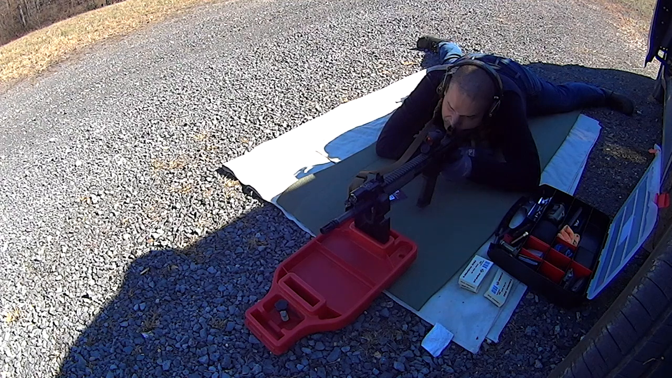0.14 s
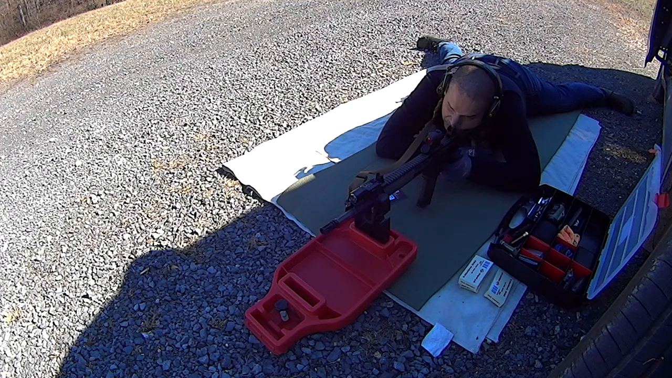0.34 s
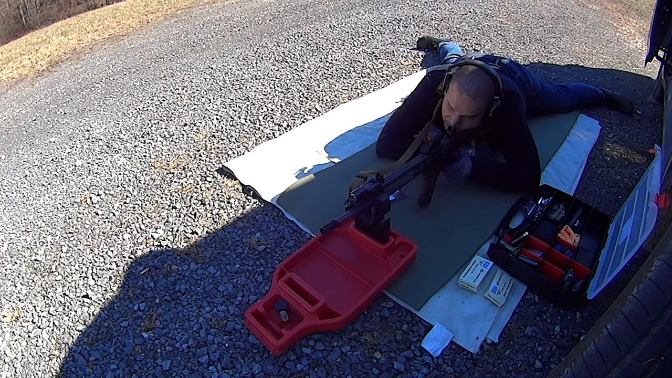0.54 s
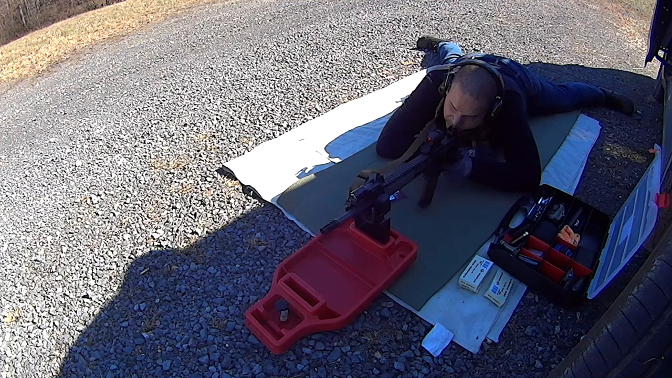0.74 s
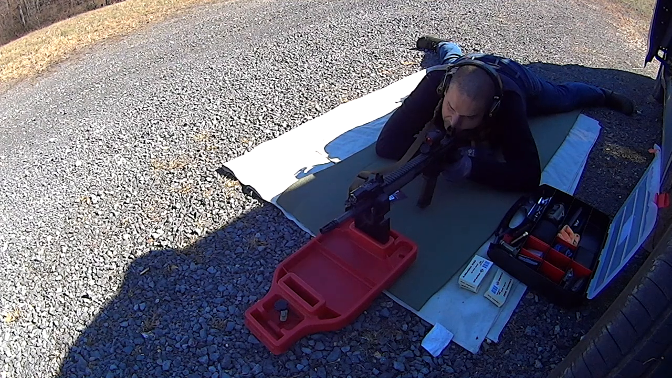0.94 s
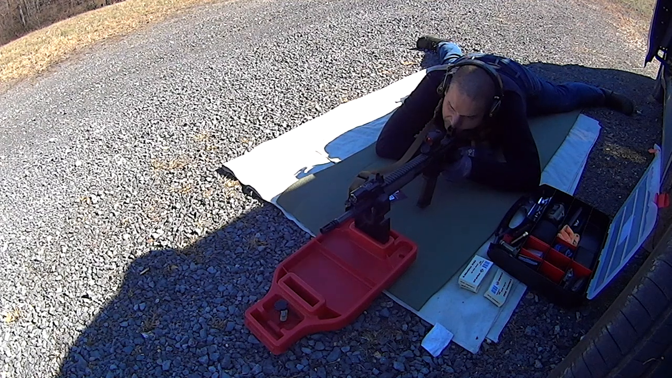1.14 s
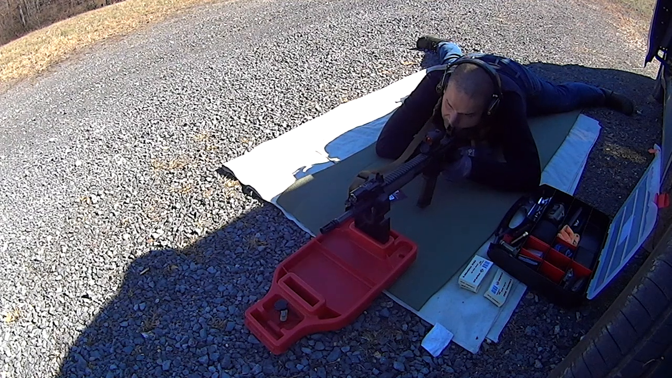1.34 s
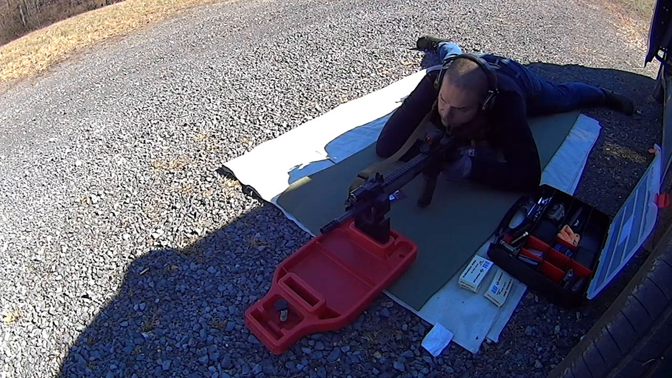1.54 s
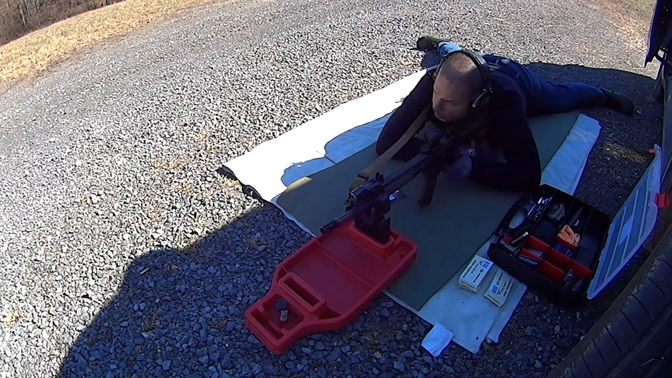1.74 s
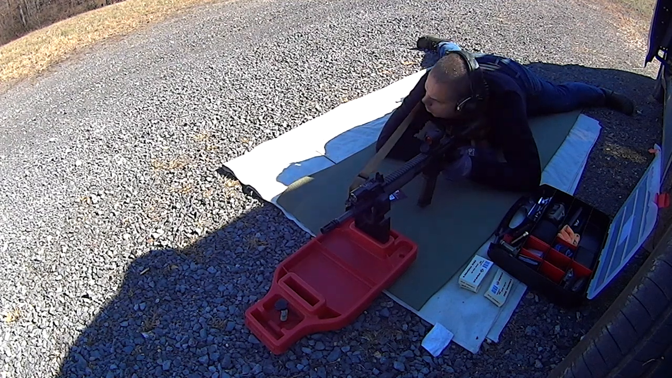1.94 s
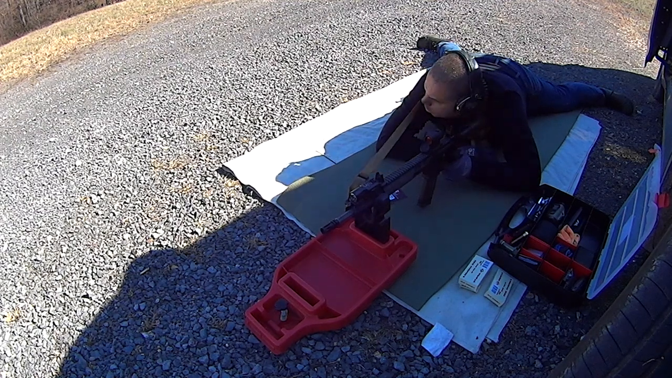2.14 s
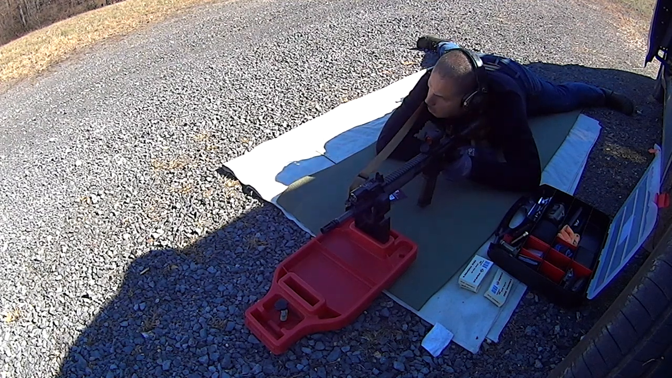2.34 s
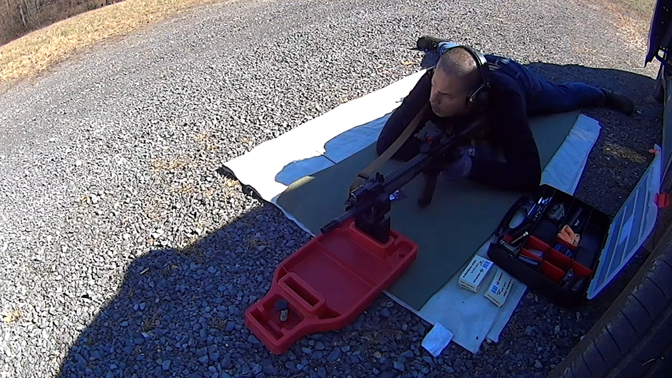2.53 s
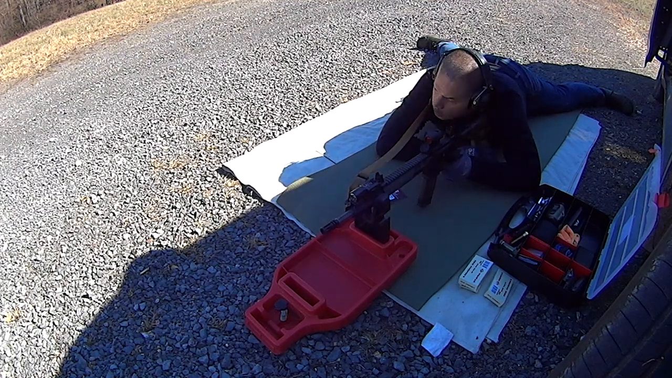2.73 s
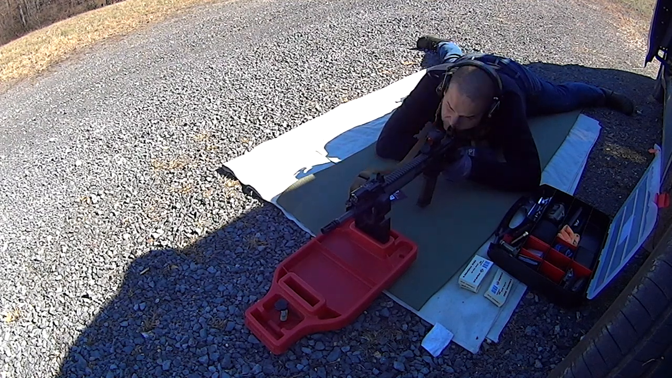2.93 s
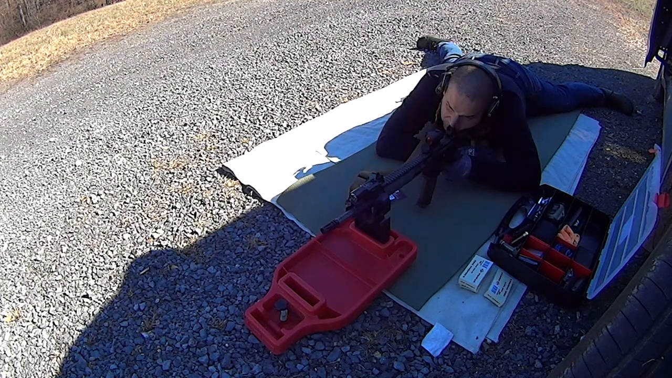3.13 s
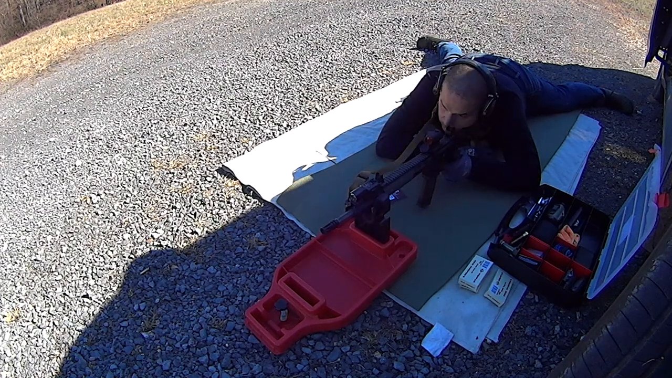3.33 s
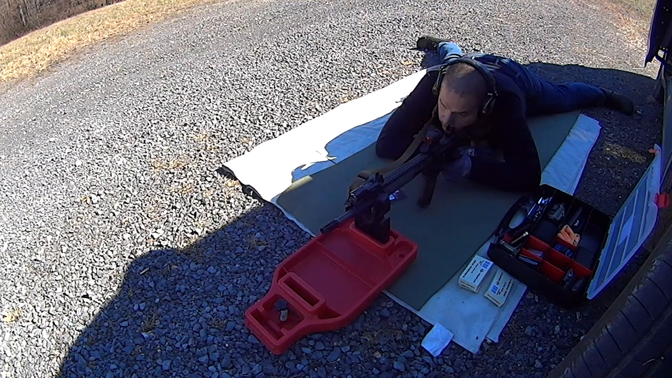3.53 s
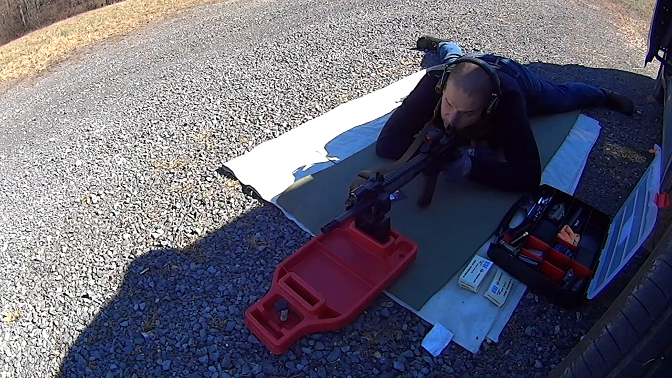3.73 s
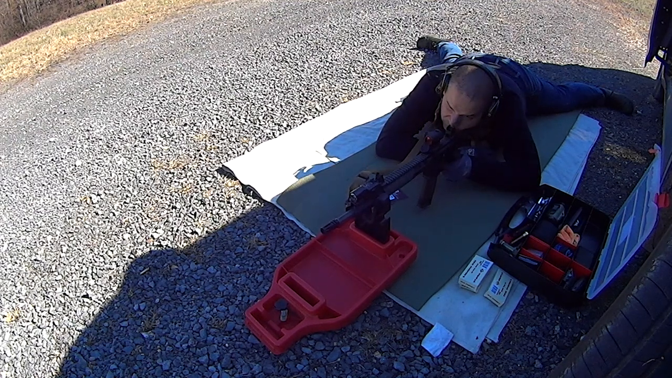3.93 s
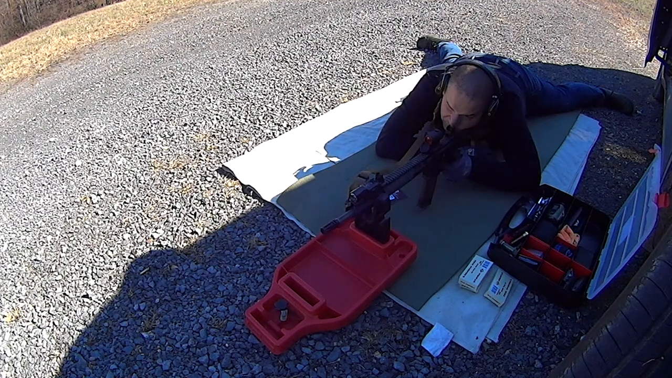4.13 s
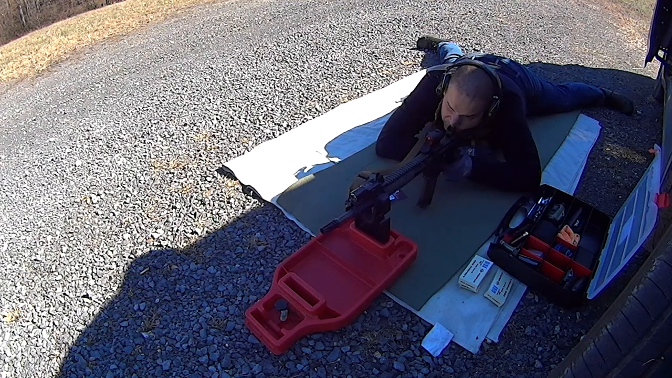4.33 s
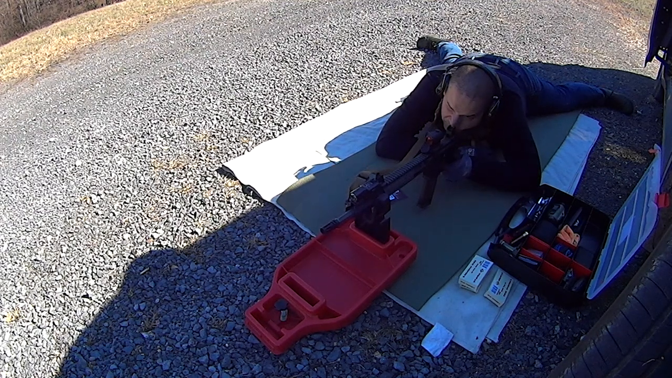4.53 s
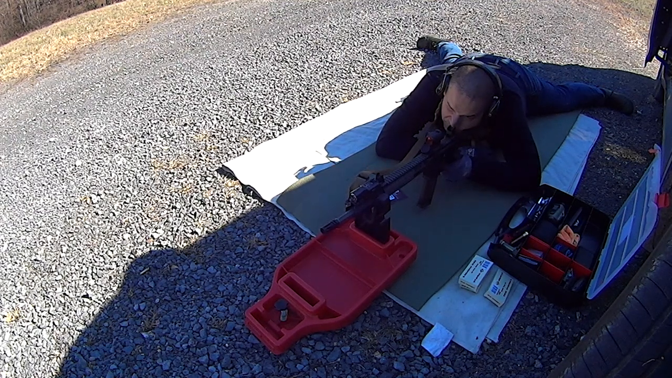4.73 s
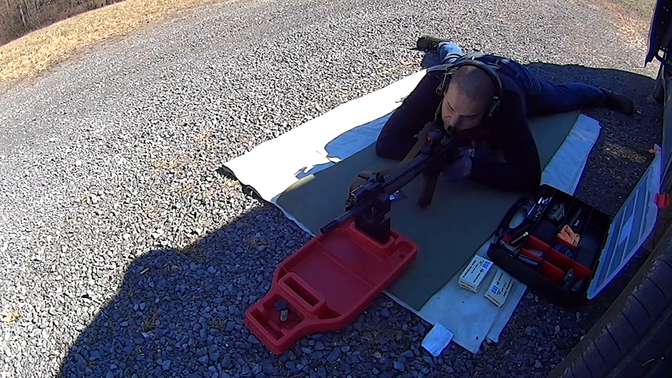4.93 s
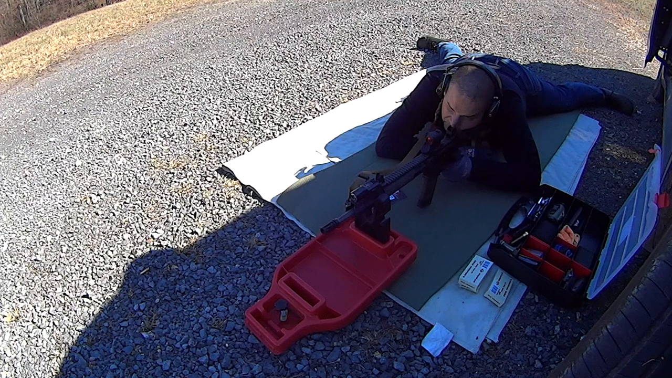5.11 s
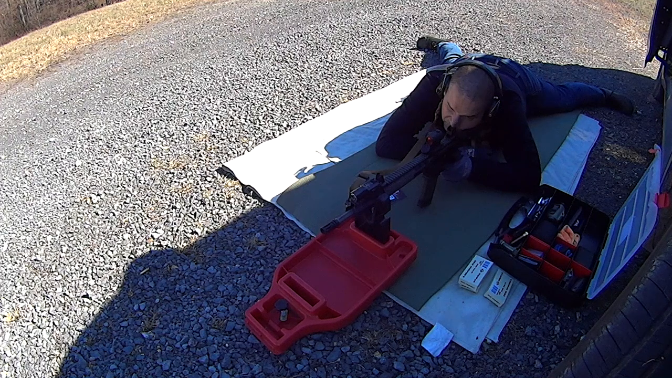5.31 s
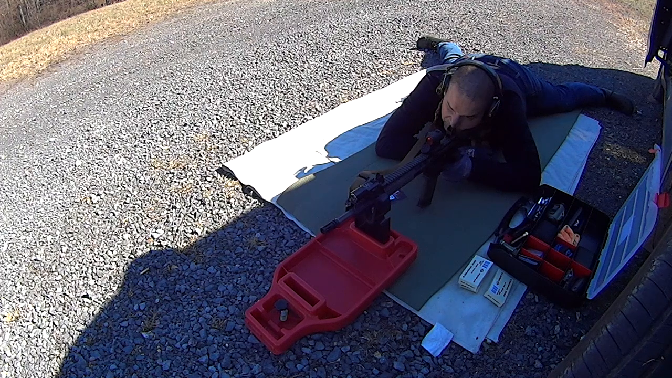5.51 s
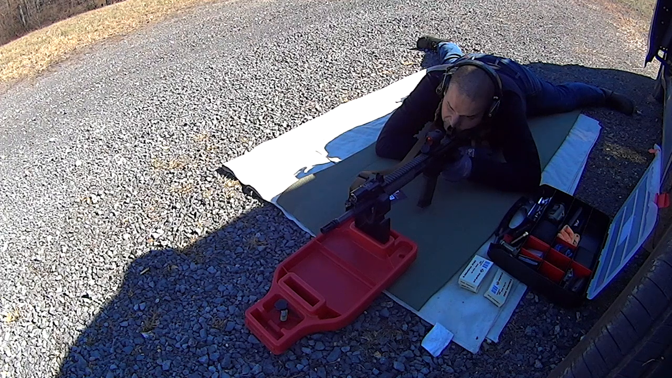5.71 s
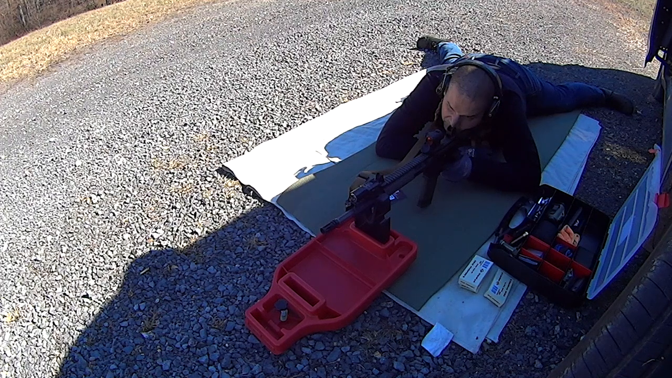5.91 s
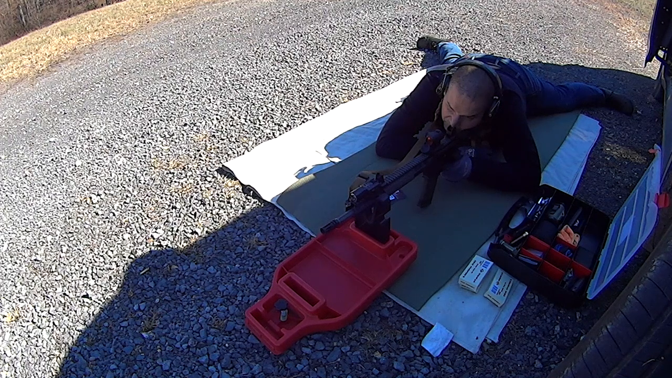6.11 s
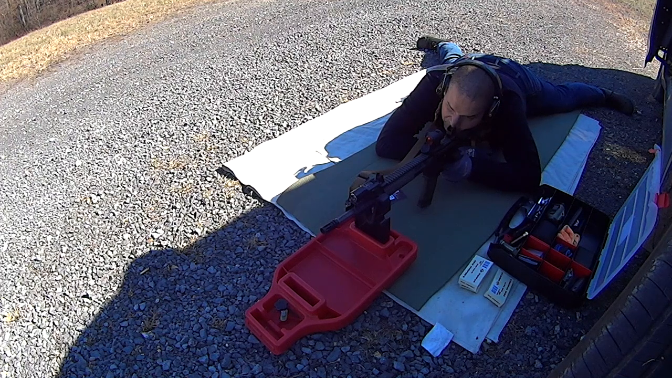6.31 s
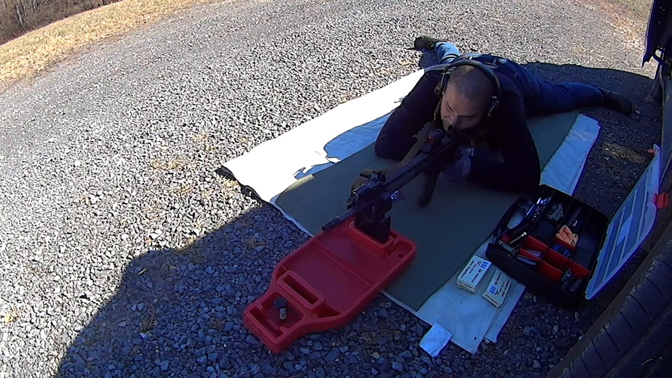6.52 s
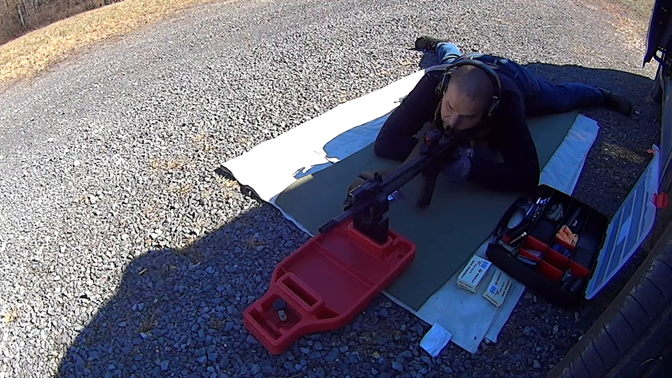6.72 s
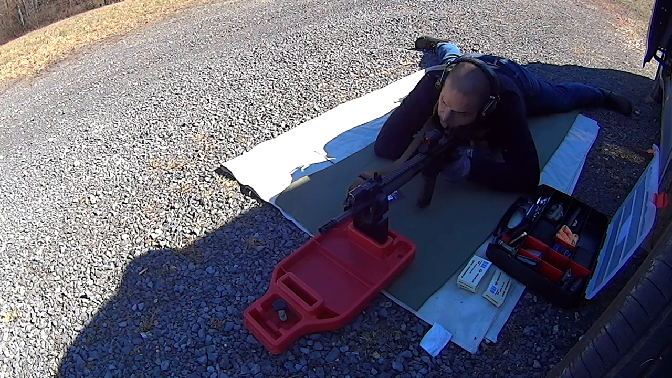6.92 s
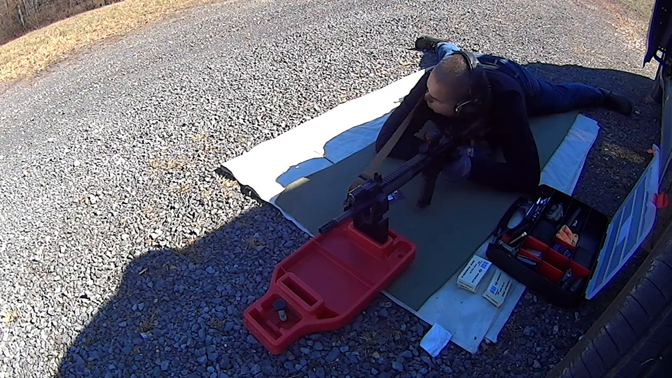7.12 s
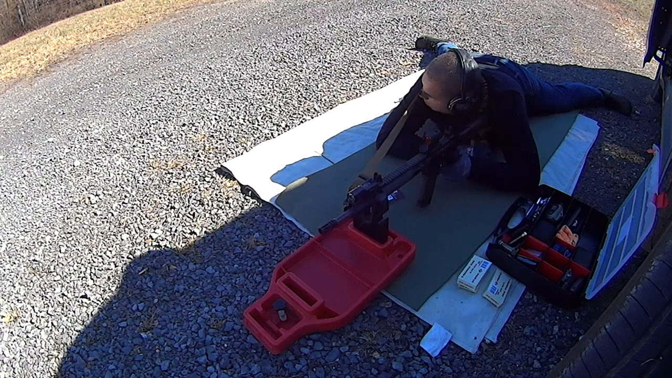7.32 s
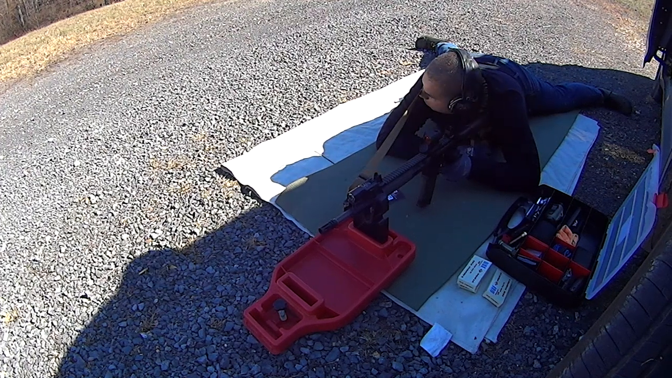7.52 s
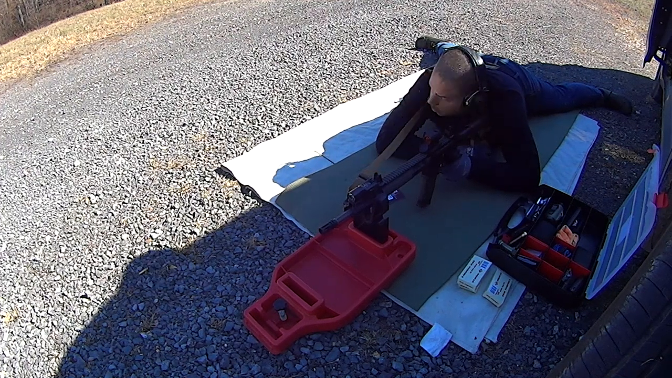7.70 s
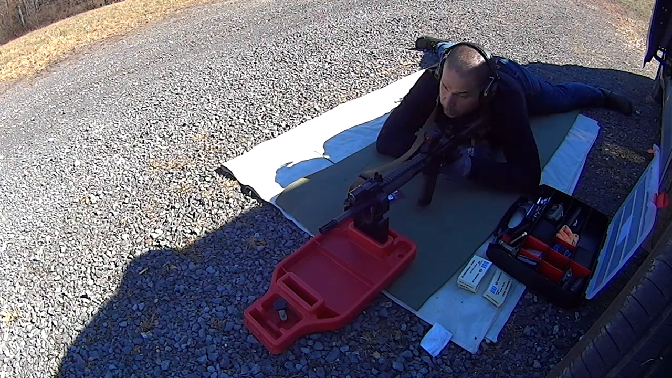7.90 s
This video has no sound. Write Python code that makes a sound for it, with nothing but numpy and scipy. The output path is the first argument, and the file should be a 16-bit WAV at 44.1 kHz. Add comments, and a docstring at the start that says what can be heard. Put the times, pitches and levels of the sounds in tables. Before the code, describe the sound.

Outdoors, a sharp rifle crack and boom rolls off hills and trees for seconds, fades to near quiet, then a second shot follows.

```python
"""Two rifle shots crack and boom beside a parked car on a gravel range, over faint wind and a low murmur.
Gas is a fast-fading rush of noise; the bolt, the spent case and the nearest trees are short pitched bursts.
The car body is coloured noise and low pushes, and its steel rings as fading sine waves.
Banks answer with low pushes too, and wide noise echoes from hills and trees grow duller over several seconds."""
import sys
import numpy as np
from scipy import signal
from scipy.fft import rfft, irfft, next_fast_len
from scipy.io import wavfile

SR = 44100
rng = np.random.default_rng(int(sys.argv[2]) if len(sys.argv) > 2 else 0)


def store_wav(level_fs):
    """Save 16-bit WAV to argv[1]."""
    pcm = np.round(np.clip(np.atleast_2d(level_fs), -1, 1) * 32767)
    wavfile.write(sys.argv[1], SR, pcm.T.astype(np.int16))


N = 355225

# In left-right columns, plus is louder on the left. In colour tables only the shape over Hz counts.

# Low murmur of the valley. Each row: pitch in Hz, relative level in dB per Hz.
MURMUR_COLOUR = [(12, -53.5), (20, -25.5), (86, -10.5), (165, -4.5), (198, -1), (253, -4), (339, -23),
                 (448, -11.5), (555, -26), (653, -27.5), (1000, -26), (1300, -60.5), (2200, -120)]
# Murmur loudness. Each row: time in seconds, level in dB.
MURMUR_LEVEL = [(0, -54), (5, -55), (6.1, -62.5), (6.3, -54.5), (8.05, -51)]
# Air moving over the microphones. Each row: pitch in Hz, relative level in dB per Hz.
WIND_COLOUR = [(11, -39.5), (18, -12), (86, -0.5), (113, -17), (140, 1.5), (180, -26.5), (310, -120)]
# Wind loudness. Each row: time in seconds, level in dB.
WIND_LEVEL = [(0, -77), (2, -57), (6, -67.5), (8.05, -64)]
# The shots. Each row: start in seconds, level added to car and echoes in dB, treble lift of the far echo
# in dB per second and octave, starting blast level in dB, bolt cycle in seconds.
SHOTS = [(0.602, 2, 2, -15, .134), (6.509, 2, 1, -13, 0.15)]
# Hiss of the gas. Each row: pitch in Hz, relative level in dB per Hz.
GAS_COLOUR = [(710, -14.5), (1200, -2), (1960, -3.5), (3120, -18.5), (3400, -4), (3910, -6), (5250, -3),
              (7730, -6.5), (11200, -11.5), (11500, -24.5), (15000, -60), (22000, -120)]
# Hiss while the bolt runs and after. Each row: time after the shot in bolt cycles, level in dB.
CYCLE_HISS = [(0, -36), (.3, -32), (.55, -22.5), (.75, -24), (.96, -24), (1.03, -36.5), (1.4, -42.5),
              (1.65, -41.5), (1.9, -42.5)]
# Muzzle crack and bolt contacts. Each row: seconds after the shot, approximate peak in dB, pitch in Hz.
ACTION = [(.0005, 0.5, 5050), (0.017, -7, 1540), (.067, -8.5, 4000), (0.0805, -2.5, 5270),
          (.1033, -4, 1850), (.126, -12, 1995), (.147, -24, 4870)]
# Booming car panels. Each row: pitch in Hz, relative level in dB per Hz.
BOOM_COLOUR = [(24, -59), (40, -26), (102, -14.5), (189, -11.5), (226, -9), (373, 2.5), (413, -9),
               (468, -1), (567, -13), (600, -4.5), (780, -37), (1320, -120)]
# Rattling trim and small parts. Each row: pitch in Hz, relative level in dB per Hz.
RATTLE_COLOUR = [(320, -30), (540, 0.5), (626, -0.5), (1310, -9), (1390, -19.5), (1500, -8), (1860, -13),
                 (2170, -16.5), (3500, -18), (4550, -50), (7700, -120)]
# Car body, timed for the first shot. Each row: time in seconds, boom in dB, rattle in dB,
# both before the shot's added level and the fades.
BODY = [(0.603, -32.5, -29.5), (0.619, -24, -14.5), (0.663, -19.5, -20.5), (0.695, -28.5, -42),
        (0.73, -25, -27.5), (0.745, -21.5, -39.5), (0.79, -24, -37.5), (0.86, -35.5, -39),
        (0.875, -31.5, -36)]
# Ringing steel. Each row: pitch in Hz, relative level in dB, time to fall 60 dB in seconds.
STEEL = [(705, -4, 1.5), (797, 0, 2), (1222, -10, .6), (1373, -9, .8), (1841, -10, 1.5), (2234, -17, .6),
         (2422, -16, .9)]
# Low pushes from the car and nearby (first four rows), then low echoes from banks, timed for the first shot.
# Each row: time in seconds, strength in dB before the shot's added level, pitch in Hz.
LOW_PUSHES = [(0.618, -15.5, 320), (0.651, -11, 457), (0.756, -19.5, 350), (0.77, -13, 384),
              (0.891, -15, 275), (0.977, -14.5, 348), (1.01, -17.5, 258), (1.065, -11, 437),
              (1.083, -11.5, 310), (1.133, -16.5, 218), (1.171, -14, 254), (1.269, -13.5, 226),
              (1.4, -17, 260), (1.475, -19, 296), (1.526, -11.5, 280), (1.582, -11.5, 255),
              (1.667, -15, 286.8), (1.69, -15, 326), (1.731, -12.5, 328), (1.758, -31.5, 275),
              (1.834, -16, 360), (1.864, -16, 315), (1.999, -16.5, 251), (2.056, -17, 344),
              (2.75, -28.5, 310), (2.962, -33.5, 371)]
# Long echo, timed for the first shot. Each row: time in seconds, bright scatter in dB, low roll in dB,
# scatter's left-right difference in dB. Levels are before treble changes and the shot's added level.
ECHO = [(0.859, -39, -40, -2.5), (0.88, -28, -26, 0), (0.92, -22.5, -25, -1.5), (0.97, -25, -27, -2.5),
        (1.0, -28, -32, 1), (1.015, -22, -34, 0), (1.07, -22, -22.5, 0), (1.27, -23.5, -26.5, -0.5),
        (1.38, -27.5, -29.5, 1), (1.58, -27, -24.5, 1.5), (1.85, -30.5, -21.5, 4), (1.9, -31, -28.5, 1.5),
        (2.26, -37, -30, 0.5), (2.969, -51, -46, -1.5), (3.62, -64, -53, -3), (4.1, -67, -58.5, -3),
        (5.55, -82.5, -67, -2.5), (6.4, -79, -67.5, 1.5)]
# Low rolling echo. Each row: pitch in Hz, relative level in dB per Hz.
ROLL_COLOUR = [(35, -54), (60, -37), (81, -25), (190, -3.5), (337, 1), (382, -4.5), (432, -7), (536, -14),
               (651, -35), (700, -29), (910, -48.5), (1540, -120)]
# Brighter scattered echo. Each row: pitch in Hz, relative level in dB per Hz.
SCATTER_COLOUR = [(260, -21), (450, -1.5), (552, -2.5), (863, 2.5), (1120, -3), (1680, -3.5), (2080, -5.5),
                  (2590, -8.5), (4830, -18.5), (5240, -21.5), (5760, -22), (8420, -33.5), (9130, -36),
                  (11000, -41), (11500, -43.5), (15000, -66), (22000, -120)]
# Change on the way through air and over ground, minus meaning loss.
# Each row: pitch in Hz, change in dB per second before the shot's treble lift.
AIR = [(100, 1), (200, 2), (330, -2), (470, 1.5), (610, 0), (870, 2.5), (1130, -0.5), (1380, 0),
       (2000, -9.5), (3000, -15.5), (4500, -28.5), (8000, -46), (11000, -53.5)]
# Bright echoes from the nearest trees, timed for the first shot. Each row: time in seconds, approximate
# peak in dB before the treble cut and the shot's added level, pitch in Hz, left-right difference in dB.
SLAPS = [(0.876, -16.5, 1646, -4), (0.893, -8, 960, -6), (0.914, -7.5, 1493, 4.5), (0.925, -4, 1630, -2.5),
         (0.96, -10.5, 1610, 2.5), (0.98, -8, 821, 7), (1.01, -8.5, 1750, 2), (1.024, -8, 1500, 2.5),
         (1.047, -11.5, 1500, 7.5), (1.063, -2, 900, -1.5), (1.133, -10, 987, -3), (1.17, -5, 915, 0),
         (1.199, -10.5, 810, -3.5), (1.234, -16, 974, -3)]
# Spent case on gravel, after both shots. Each row: time in seconds, approximate peak in dB,
# pitch in Hz, time for the main burst to fall 60 dB in seconds.
CASE = [(0.9975, -21, 9530, 0.018), (1.179, -30, 9500, 0.0089), (1.3072, -35, 9470, 0.011),
        (1.3145, -30, 9700, 0.015), (1.3356, 0.5, 5170, 0.0094), (1.3868, -34, 8570, .012),
        (1.4084, -37, 9020, 0.009), (1.5965, -25, 6500, .03), (1.6040, -8, 5600, 0.023),
        (1.67, -27.5, 6880, 0.028), (1.7093, -40, 8000, .016), (1.854, -38, 7000, .016),
        (1.8756, -39, 8000, .016), (1.9135, -37, 4840, .018), (1.9613, -32, 5500, 0.025),
        (2.012, -40, 6930, .014), (2.0375, -34, 4300, .016), (2.0842, -36, 5570, 0.015),
        (6.9948, -5.5, 6950, 0.012), (7.1052, -38, 10100, 0.022), (7.201, -22, 9940, 0.0092),
        (7.5112, -25, 9030, 0.013), (7.9917, -36, 4240, .014)]
# Resonances of the brass case. Each row: pitch in Hz, width in Hz, relative level in dB.
BRASS = [(3150, 430, -5), (4160, 230, -2.5), (5250, 130, -3), (6630, 130, -13), (7700, 270, -11.5),
         (9100, 600, -11.5)]
# Microphone noise. Each row: pitch in Hz, relative level in dB per Hz.
HISS_COLOUR = [(350, -35), (600, 6.5), (768, 1.5), (902, 2.5), (2040, 0), (2580, -2.5), (10200, -9.5),
               (11100, -11), (11500, -30.5), (15000, -50), (22000, -120)]
# How alike left and right are for blast and car. Each row: pitch in Hz, likeness from -1 to 1.
NEAR_ALIKE = [(60, 0.64), (140, 0.99), (340, 0.36), (820, 0.12), (1970, 0.17), (4730, 0.47), (11300, 0.71)]
# How alike left and right are for distant sound. Each row: pitch in Hz, likeness from -1 to 1.
FAR_ALIKE = [(60, 0.15), (140, 0.84), (340, 0.7), (820, 0.056), (1970, 0.14), (4730, 0.6), (11300, 0.26)]
# How alike left and right are for microphone noise. Each row: pitch in Hz, likeness from -1 to 1.
HISS_ALIKE = [(60, 0.88), (140, 0.58), (340, 0.44), (820, -0.7), (1970, -0.62), (4730, -0.01),
              (11300, 0.72)]

BLAST_FALL_DB_S = 422  # how fast the first rush of gas dies
ACTION_T60_S, ACTION_PAN_DB = 0.042, -4.5
BODY_PAN_DB, BODY_CENTRES_S = -8.5, 0.17  # starts on the right and moves towards the middle
STEEL_DB, STEEL_PAN_DB = -35.5, -20.5
PUSH_CYCLES = 0.88  # sets the length of a low push
PUSH_PAN_DB = 4.5  # spread of the directions of the low pushes
SMALL_BANKS = 60  # smaller surfaces that answer at random moments
SMALL_OVER_ROLL_DB, SMALL_SPREAD_DB, SMALL_HZ = 2.5, 5, 275
SLAP_T60_S = 0.035
CASE_PAN_DB = -5.5
CREST_DB = 9.5  # allowance for a noise burst's peak over its average (rms) level
HISS_DB = -58.5
TOP_HZ = 11050  # sound above this is cut steeply


def amp(db):
    """Turn decibels into an amplitude factor."""
    return 10 ** (np.asarray(db) / 20)


def unit(x):
    """Scale a sound to an average (rms) level of 1."""
    return x / np.sqrt(np.mean(x ** 2) + 1e-20)


def along(points, hz):
    """Read a value between (Hz, value) points on a log pitch axis."""
    f, v = np.transpose(points)
    return np.interp(np.log(hz + 1), np.log(f + 1), v)


def curves(rows):
    """Give one value per sample for each column after the time."""
    s, *columns = np.transpose(rows)
    return [np.interp(np.arange(N) / SR, s, column) for column in columns]


def filtered(x, response):
    """Strengthen or weaken each pitch of a sound by the response."""
    size = next_fast_len(N + 8192)
    hz = np.fft.rfftfreq(size, 1 / SR)
    return irfft(rfft(x, size) * response(hz), size)[..., :N]


def pan(db):
    """Give left and right factors that differ by this many dB."""
    return amp([db / 2, -db / 2])


def add(out, s, sound):
    """Mix a sound in at a time in seconds, cutting what runs past the end."""
    start = round(s * SR)
    out[:, start:start + sound.shape[1]] += sound[:, :N - start]


def noise():
    """Make two unrelated streams of steady random noise."""
    return rng.standard_normal((2, N))


def arrivals(per_s, spread_db):
    """Make random clicks of uneven size, in two streams that share the moments."""
    rows = rng.standard_normal((int(per_s * N / SR), 3))
    when = rng.integers(0, N, len(rows))
    size = amp(spread_db * np.clip(rows[:, 0], -2, 2))
    streams = [np.bincount(when, size * rows[:, k], N) for k in (1, 2)]
    return unit(np.array(streams))


def stereo(x, spectrum, alike):
    """Colour two unrelated signals and blend them into a left-right pair of rms 1."""
    def middle_and_side(hz):
        turn = np.arccos(np.clip(along(alike, hz), -1, 1)) / 2
        return amp(along(spectrum, hz)) * [np.cos(turn), np.sin(turn)]

    mid, side = filtered(x, middle_and_side)
    return unit(np.array([mid + side, mid - side]))


def ticks(rows, width, alike, attack_s, tail_db, modes=()):
    """Make short noise bursts, each around its own pitch, with a weaker and longer tail."""
    out, t = np.zeros((2, N)), np.arange(4096) / SR
    f = np.fft.rfftfreq(len(t), 1 / SR) + 1
    rings = 1 + sum(4 * amp(db) / (1 + ((f - hz) / w * 2) ** 2) for hz, w, db in modes)
    for s, db, hz, t60, pan_db in rows:
        a, b = rng.standard_normal((2, len(t)))
        pair = [a, alike * a + (1 - alike) * b]
        band = rings / (1 + (np.log(f / hz) / width) ** 2)
        burst = unit(irfft(rfft(pair) * band))
        fall_s = max(t60, .004)
        fall = amp(-60 * t / fall_s) + amp(tail_db - 15 * t / fall_s)
        attack = 1 - np.exp(-t / attack_s)
        add(out, s, amp(db - CREST_DB) * pan(pan_db)[:, None] * burst * fall * attack)
    return out


def murmur():
    """Distant sounds merge into a low, slightly uneven noise."""
    return amp(curves(MURMUR_LEVEL)[0]) * stereo(noise() + 0.33 * arrivals(260, 3), MURMUR_COLOUR, FAR_ALIKE)


def wind():
    """Light wind makes low, uneven noise that differs at the two microphones."""
    return amp(curves(WIND_LEVEL)[0]) * stereo(noise() + arrivals(49, 2), WIND_COLOUR, [(30, 0.23)])


def gas():
    """Escaping gas is a rush of noise that dies fast, over a hiss that follows the bolt cycle."""
    out, t = np.zeros((2, N)), np.arange(N) / SR
    cycles, hiss_db = np.transpose(CYCLE_HISS)
    for s, _, _, blast_db, cycle_s in SHOTS:
        since = np.maximum(t - s, 0)
        ending_db = -300 * np.maximum(since - cycles[-1] * cycle_s, 0)
        hiss = amp(np.interp(since / cycle_s, cycles, hiss_db) + ending_db)
        rush = amp(blast_db - BLAST_FALL_DB_S * since)
        rough = noise() + 0.91 * arrivals(2000, 1.9)
        out += (t > s) * (rush + hiss) * stereo(rough, GAS_COLOUR, NEAR_ALIKE)
    return out


def action():
    """The muzzle crack and each bolt contact are sharp pitched bursts, timed alike for both shots."""
    rows = [(s + late, db, hz, ACTION_T60_S, ACTION_PAN_DB) for s, *_ in SHOTS for late, db, hz in ACTION]
    return ticks(rows, width=0.44, alike=.7, attack_s=0.00015, tail_db=-30)


def car_body():
    """The blast makes panels boom and small parts rattle, heard as coloured noise."""
    boom_db, rattle_db = curves(BODY)
    first = SHOTS[0][0]
    t = np.maximum(np.arange(N) / SR - first, 0)
    ending = amp(-300 * np.maximum(t + first - BODY[-1][0], 0))
    life = (1 - np.exp(-t / .005)) * ending
    boom = amp(boom_db) * stereo(noise(), BOOM_COLOUR, NEAR_ALIKE)
    rattle = amp(rattle_db) * stereo(noise(), RATTLE_COLOUR, NEAR_ALIKE)
    direction = pan(BODY_PAN_DB * np.exp(-(t / BODY_CENTRES_S) ** 2))
    return life * direction * (boom + rattle)


def steel():
    """Struck by the blast, steel rings at several pitches that fade at different speeds."""
    out, t = np.zeros((2, N)), np.arange(SR) / SR
    ring = sum(amp(db - 60 * t / t60) * np.sin(2 * np.pi * hz * t) for hz, db, t60 in STEEL)
    add(out, SHOTS[0][0], amp(STEEL_DB) * pan(STEEL_PAN_DB)[:, None] * ring)
    return out


def low_pushes():
    """The car and nearby, then banks, each give one low push; small banks follow the level of the roll."""
    out, t = np.zeros((2, N)), np.arange(2048) / SR - .02
    s, _, roll_db, _ = np.transpose(ECHO)
    when = rng.uniform(s[0], SHOTS[1][0], SMALL_BANKS)
    luck = rng.standard_normal((SMALL_BANKS, 2))
    small_db = np.interp(when, s, roll_db) + SMALL_OVER_ROLL_DB + SMALL_SPREAD_DB * luck[:, 0]
    small_hz = SMALL_HZ * np.exp(0.18 * luck[:, 1])
    rows = [*LOW_PUSHES, *zip(when, small_db, small_hz)]
    sides_db = PUSH_PAN_DB * rng.standard_normal(len(rows))
    for (s, db, hz), side_db in zip(rows, sides_db):
        push = np.exp(-(t * hz / PUSH_CYCLES) ** 2) * np.sin(2 * np.pi * hz * t)
        # The middle of the push comes shortly after the listed time.
        add(out, s + PUSH_CYCLES / hz - .018, amp(db) * pan(side_db)[:, None] * push)
    return out


def far_echo(hills, trees, treble_db):
    """Many distant reflections blur into noise that grows duller with travel time."""
    scatter_db, roll_db, pan_db = curves(ECHO)
    t = np.arange(N) / SR
    roll = amp(roll_db) * stereo(hills + 0.94 * noise(), ROLL_COLOUR, FAR_ALIKE)
    scatter = amp(scatter_db) * pan(pan_db) * stereo(trees + 1.66 * noise(), SCATTER_COLOUR, FAR_ALIKE)
    # Split the sound into short moments and pitches, so each can change in level.
    hz, moment, parts = signal.stft(roll + scatter, SR, nperseg=512)
    octaves = np.clip(np.log2(hz / 1000 + 0.0013), 0, 2)  # about 1 kHz up to 4 kHz
    slope_db = along(AIR, hz) + treble_db * octaves
    # No change half a second after the shot; never more than 14 dB of boost.
    change_db = np.minimum(slope_db[:, None] * (moment - SHOTS[0][0] - .5), 14)
    far = signal.istft(parts * amp(change_db), SR, nperseg=512)[1][:, :N]
    start = amp(-500 * np.maximum(ECHO[0][0] - t, 0))
    return start * far


def near_trees():
    """The nearest trees return bright, short slaps; the air takes off some treble."""
    rows = [(s, db, hz, SLAP_T60_S, pan_db) for s, db, hz, pan_db in SLAPS]
    slaps = ticks(rows, width=0.55, alike=0.64, attack_s=.0006, tail_db=-33.5)
    return filtered(slaps, lambda hz: 1 / (1 + (hz / 7000) ** 4))


def surroundings():
    """Car, low pushes and near trees repeat for both shots; drifting air changes part of the far answer."""
    firm = car_body() + steel() + low_pushes() + near_trees()
    hills, trees = arrivals(1200, 2.5), arrivals(1200, 5.4)
    out = np.zeros((2, N))
    for s, level_db, treble_db, *_ in SHOTS:
        answer = far_echo(hills, trees, treble_db) + firm
        add(out, s - SHOTS[0][0], amp(level_db) * answer)
    return out


def spent_case():
    """The case skips over gravel, each contact a noise burst coloured by the brass resonances."""
    rows = [(*row, CASE_PAN_DB) for row in CASE]
    return ticks(rows, width=0.56, alike=0.53, attack_s=0.00034, tail_db=-13, modes=BRASS)


def scene():
    """Mix the quiet background, the shots, their echoes and the spent case."""
    background = murmur() + wind()
    rifle = gas() + action()
    return background + rifle + surroundings() + spent_case()


def record(dry):
    """Add microphone hiss, round off overloaded peaks and cut the highest treble steeply."""
    x = dry + amp(HISS_DB) * stereo(noise(), HISS_COLOUR, HISS_ALIKE)
    x = x / (1 + np.abs(x / .95) ** 6) ** (1 / 6)

    def treble_cut(hz):
        over = hz - TOP_HZ
        return amp(-27 * np.clip(over / 150, 0, 1) - np.maximum(over, 0) / 120)

    return filtered(x, treble_cut)


dry = scene()
out = record(dry)
store_wav(out)
```